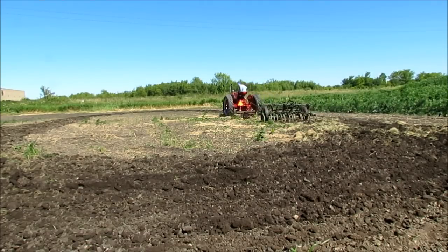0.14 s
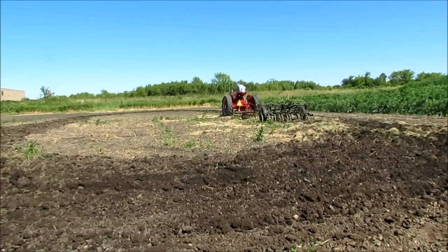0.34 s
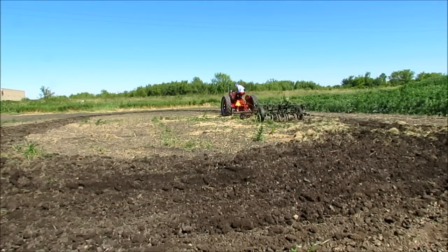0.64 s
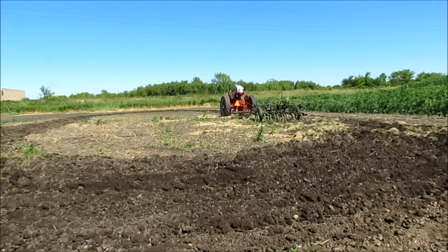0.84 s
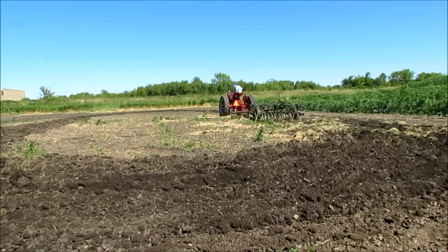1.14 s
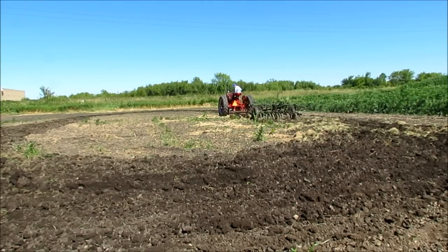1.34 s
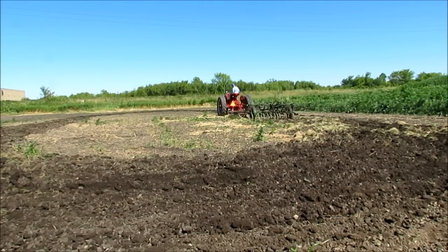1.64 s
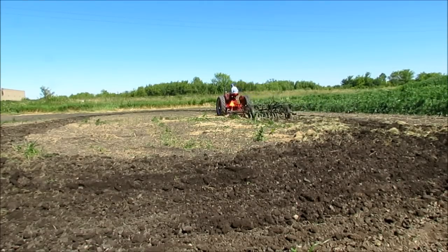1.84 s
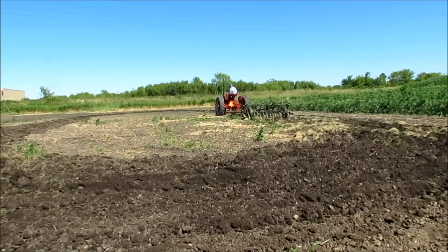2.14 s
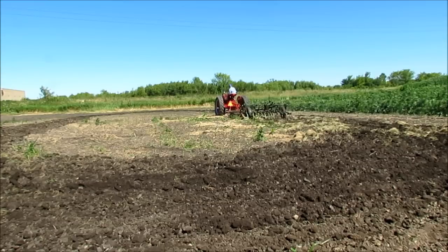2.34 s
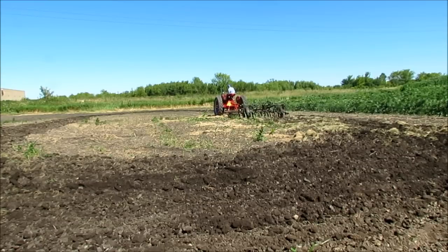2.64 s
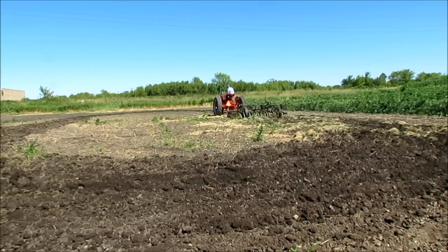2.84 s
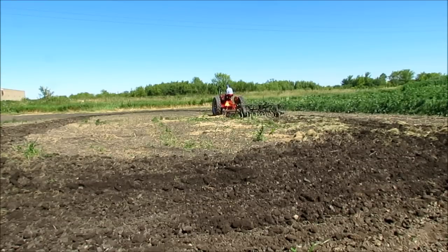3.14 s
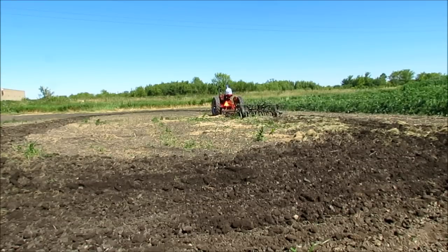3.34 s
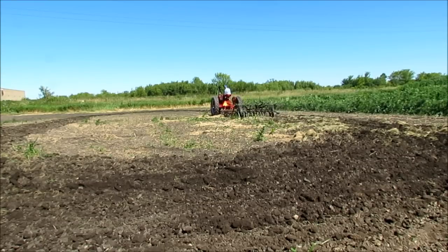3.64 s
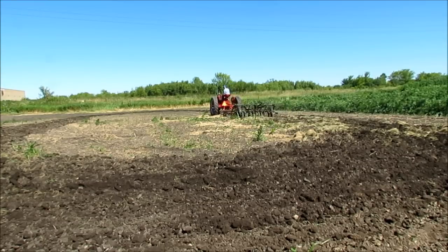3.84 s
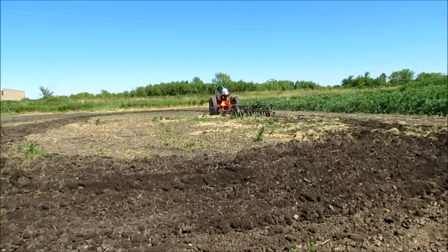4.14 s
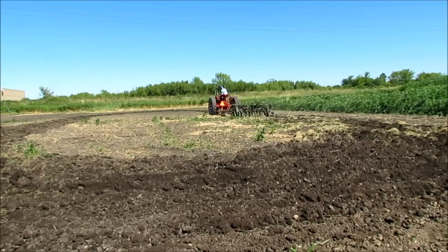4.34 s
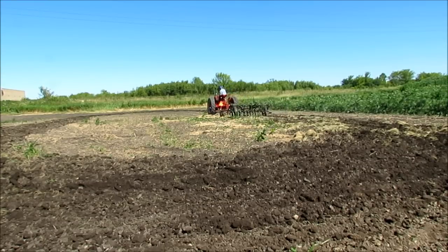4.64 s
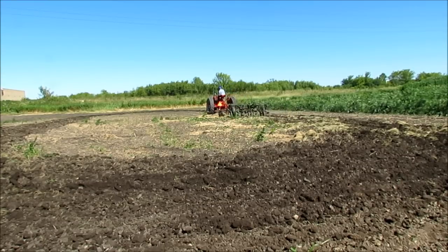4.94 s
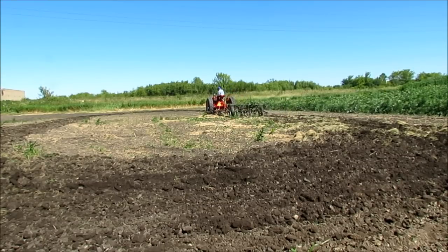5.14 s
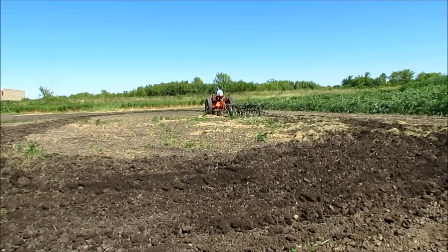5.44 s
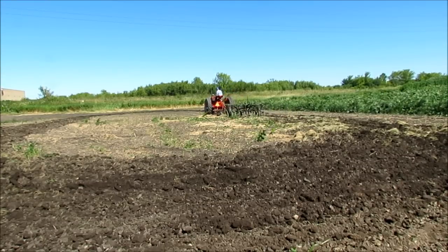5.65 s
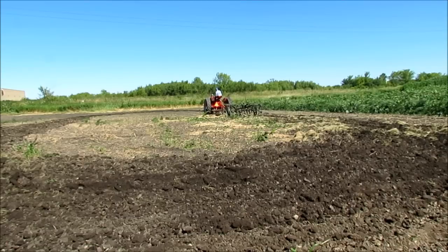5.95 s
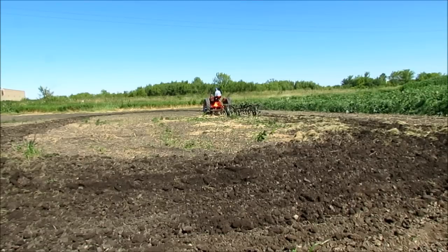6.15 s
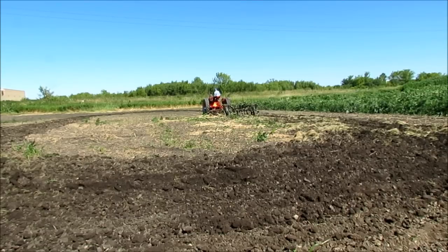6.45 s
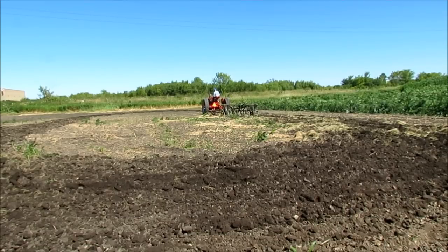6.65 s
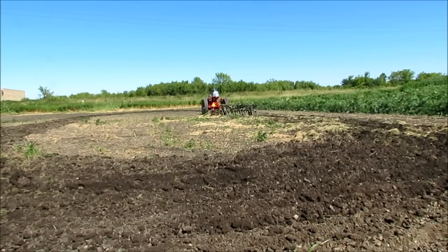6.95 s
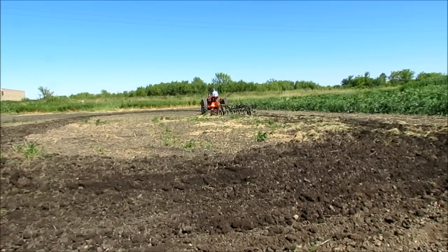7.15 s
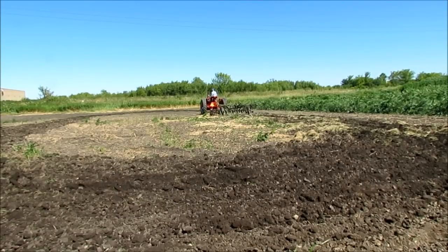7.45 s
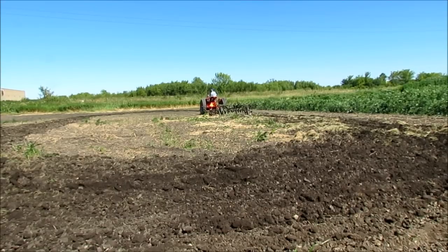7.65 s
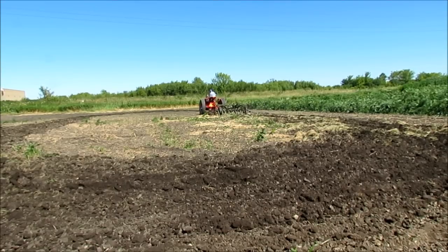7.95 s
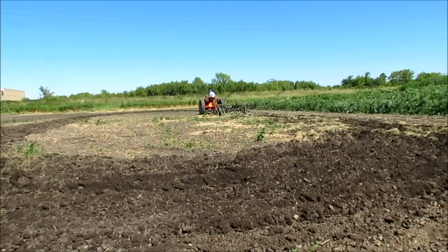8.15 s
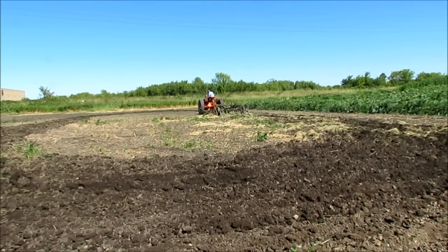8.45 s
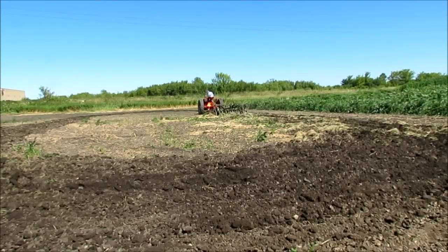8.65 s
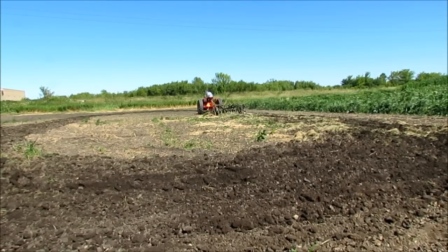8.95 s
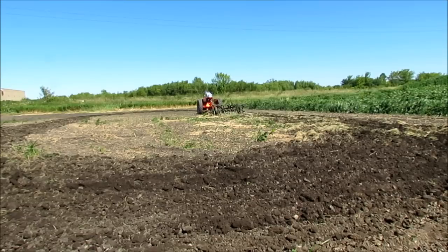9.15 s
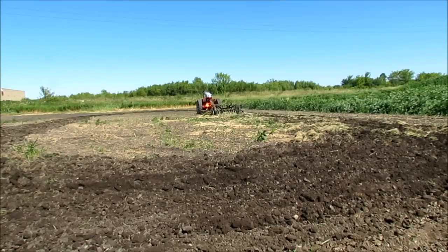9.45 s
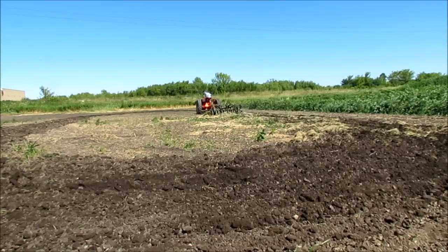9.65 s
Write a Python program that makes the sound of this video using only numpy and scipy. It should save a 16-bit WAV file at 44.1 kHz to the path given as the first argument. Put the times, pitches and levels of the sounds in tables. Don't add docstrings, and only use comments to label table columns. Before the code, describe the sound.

An old four-cylinder tractor pulls a harrow about thirty metres away in an open field. Its exhaust gives a rapid, dry, rasping bark at steady governed speed, blurring into a rough buzz over a low drone. Moving air makes the tone brighten, dull and waver. Soft low wind gusts thump and flutter at the microphone, stronger on the left. The engine never stops.

```python
import sys
import numpy as np
from scipy import signal
from scipy.fft import rfft, irfft, next_fast_len
from scipy.io import wavfile
from scipy.ndimage import uniform_filter1d, map_coordinates

SR = 44100
rng = np.random.default_rng(int(sys.argv[2]) if len(sys.argv) > 2 else 0)


def natural_amplitude(level_db):
    exponent = np.asarray(level_db, float) / 20
    return 10 ** exponent


def unload_audio(sound):
    columns = np.transpose(np.atleast_2d(sound))
    steps = np.round(np.clip(columns, -1, 1) * 32767)
    wavfile.write(sys.argv[1], SR, steps.astype(np.int16))


N = 432621
BEAT_HZ = 40.6


def unit(x):
    return x / np.sqrt(np.mean(np.abs(x) ** 2) + 1e-20)


def along(points, hz):
    f, v = np.transpose(points)
    return np.interp(np.log(hz + 1), np.log(f + 1), v)


def curves(rows, t):
    s, *columns = np.transpose(rows)
    return np.array([np.interp(t, s, c) for c in columns])


def wobble(rate):
    knots = rng.standard_normal(int(N * rate / SR) + 4)
    return map_coordinates(knots, [np.arange(N) * rate / SR])


def coloured(spectrum):
    size = next_fast_len(N)
    white = rfft(rng.standard_normal(size))
    gain = natural_amplitude(along(spectrum, np.fft.rfftfreq(size, 1 / SR)))
    return unit(irfft(white * gain, size)[:N])


def swell(t, s, length):
    return np.cos(np.pi * np.clip((t - s) / length, -.5, .5)) ** 2


# (time [s], lag [ms])
FIRING_LAG = [(0.0, -10.9), (0.7, -13.9), (1.0, -11.1), (1.2, -5.5), (1.4, -3.0), (1.8, -0.6), (2.2, -2.5),
              (3.1, 11.2), (3.6, 8.2), (4.6, 8.9), (5.0, 6.7), (6.0, -23.1), (6.75, -26.4), (7.55, -10.3),
              (8.05, -9.3), (8.6, 5.8), (9.2, 6.3), (9.81, 19.0)]


def firings():
    beat = np.arange(-1, int(N / SR * BEAT_HZ) + 2) / BEAT_HZ

    def lag(t):
        return curves(FIRING_LAG, t)[0] / 1000

    return beat + lag(beat + lag(beat))


# (ring [dB], crack [dB], rasp [dB], fizz [dB])
CYLINDERS = [
    (-34, -33, -36, -37),
    (-37, -31.5, -32, -33),
    (-34.5, -33, -36, -37.5),
    (-38.5, -31, -34.5, -35),
]
# (time [s], carry [dB], treble lean [dB])
CARRY = [(0.0, 1.65, 0.4), (1.05, 1.1, 0), (1.15, 3, 0.5), (1.94, -1, -2.5), (2.04, 2.8, -0.9),
         (2.72, -3, 0.1), (3.86, 3.5, -0.7), (3.96, -7.5, 0), (4.33, -0.5, 1.2), (5.71, 0.6, -0.8),
         (5.81, -4.5, -1.5), (5.91, -1, 1.4), (6.19, 4, -1.8), (8.04, 0.1, -1.05), (8.46, 3, -2.4),
         (9.12, -2, -3), (9.31, 3.5, -2), (9.81, 1.1, -3)]
# (time [s], length [s], gain [dB], register [Hz])
EDDIES = [(0, 0.15, -3.5, 7000), (0.18, 0.27, 7, 1000), (0.364, 0.13, 7, 4440), (0.638, 0.18, 3.5, 4300),
          (0.874, 0.11, -7, 7000), (1.168, 0.14, 5.5, 2000), (1.743, 0.16, 7, 7100), (2.71, 0.27, -4, 7000),
          (2.827, 0.16, 8, 4300), (3.174, 0.45, 6, 1400), (3.315, 0.22, -5, 4200),
          (3.526, 0.11, 8.9, 11000), (3.877, 0.075, -11, 2900), (4.278, 0.12, 6, 2090),
          (4.85, 0.33, -4.0, 4500), (5.415, 0.35, -4.6, 7100), (5.548, 0.1, 8.5, 11000),
          (5.727, 0.13, 7.5, 7000), (5.983, 0.069, 10.5, 4300), (6.07, 0.27, -9.5, 10800),
          (6.707, 0.14, 11, 11500), (7.095, 0.18, -4.5, 4260), (7.46, 0.43, 8, 11000),
          (7.702, 0.15, 7.5, 6950), (7.7, 0.44, 4, 1000), (7.875, 0.1, 12.7, 11000),
          (7.965, 0.3, -4.5, 2900), (8.684, 0.33, -4, 2040), (9.48, 0.18, -7, 4300),
          (9.703, 0.16, 6.5, 10800)]
# (time [s], extra level [dB], register [Hz])
ODD_FIRINGS = [(0.087, 3.5, 2900), (0.775, 4, 1400), (1.55, 10, 11000), (2.018, 7, 7000), (2.214, 3, 1400),
               (2.565, 3.5, 4300), (2.615, 3, 2900), (3.09, 6.5, 4360), (3.949, 4.0, 2900),
               (4.418, 3, 2900), (4.492, 4, 4300), (4.688, 2, 1000), (4.737, 4.5, 7000), (5.007, 3.5, 2000),
               (5.054, 5.5, 2900), (5.628, 4, 11000), (6.06, 5, 4300), (6.898, 5.5, 2000), (7.823, 6, 1000),
               (8.095, 8.5, 7000), (8.273, 4, 2900), (8.349, 5, 4300), (8.45, 7.5, 4370),
               (8.526, 5.5, 4270), (8.577, 8, 11200), (8.676, 8, 11000), (8.922, 4, 7000), (8.947, 7, 7000),
               (9.244, 5.5, 1000), (9.344, 6.5, 4300)]
REGISTERS_HZ, REACH_OCT = [1400, 2900, 5460, 9700], 1.35


def arrival(times):
    carry_db, lean_db = curves(CARRY, times)
    cylinder = np.arange(len(times)) % len(CYLINDERS)
    level_db = np.transpose(CYLINDERS)[:, cylinder] + carry_db + np.outer([-1, 0, 1, 1], lean_db)

    def share(hz):
        return np.exp(-(np.log2(hz / np.array(REGISTERS_HZ)) / REACH_OCT) ** 2)

    for s, length, db, hz in EDDIES:
        level_db += db * np.outer(share(hz), swell(times, s, length))
    for s, db, hz in ODD_FIRINGS:
        level_db[:, np.argmin(abs(times - s))] += db * share(hz)
    return level_db


def peak(hz, centre, width):
    return 1 / (1 + (2 * (hz - centre) / width) ** 2)


# (frequency [Hz], density [dB per Hz])
BARK = [(240, -3.5), (400, -19), (570, -11), (814, -16.5), (1110, -4.5), (1730, -4.5), (2840, -4.5),
        (4380, 2), (8760, -2.5), (11200, -6.5), (16000, -20)]
# (frequency [Hz], width [Hz], height [dB])
STACK = [(573.8, 21.5, 10), (1138, 40, 3), (1468, 76, 7), (1730, 285, 10), (2144, 50, 5.5), (2820, 60, 3)]


def bark_colour(hz, crack_hz, match_db, crack_db=9, crack_width_hz=850, dull_hz=8330, dull_db=4.5):
    count = len(crack_hz)
    crack_hz, depth = crack_hz[:, None], natural_amplitude(match_db)[:, None]
    colour_db = along(BARK, hz) + sum(db * peak(hz, c, w) for c, w, db in STACK)
    colour_db = colour_db + crack_db * peak(hz, crack_hz, crack_width_hz)
    colour_db = colour_db - 7 * depth * peak(hz, 1.54 * crack_hz, 1170)
    colour_db = colour_db - 4 * depth * peak(hz, 0.698 * crack_hz, 150)
    firing, pitch = spot_knots(count, hz)
    slow = map_coordinates(rng.standard_normal((count // 5 + 2, 40)), [firing / 5, pitch], order=1)
    colour_db = colour_db + 2.5 * slow * np.clip(hz / 7000, 0, 1)
    loss_db = dull_db * rng.exponential(size=(count, 1))
    return colour_db - loss_db * np.clip(hz / dull_hz - 1, 0, 1)


def spot_knots(count, hz):
    return np.broadcast_arrays(np.arange(count)[:, None], 7 * np.log(1 + hz / 700))


# (low edge [Hz], high edge [Hz], rise [ms], t60 [ms], echo [dB], steady rush [dB],
# scatter [dB])
PARTS = [
    (880, 2285, 4.06, 42.5, -32, -39, 0.64),
    (2007, 3330, 2.8, 14, -29, -20.5, 1.53),
    (3620, 6800, 4.67, 24, -37, -19.5, 1.5),
    (7980, 21000, 2.35, 20.7, -39, -26.5, 3),
    (430, 990, 3.13, 45, -18.5, -17, 2),
]
# (time [s], frequency [Hz], match [dB])
GROUND = [(0, 3030, -4.5), (1, 2930, -0.5), (1.7, 3000, -0.5), (2.1, 2530, -2), (2.45, 2860, 2.5),
          (3.1, 3130, -3.5), (3.6, 2500, -2), (3.92, 2970, 2), (4.76, 2490, 1), (5.04, 3340, -.5),
          (5.7, 3150, -5.5), (6.0, 2550, -1), (7.1, 2300, -3.5), (7.4, 3470, -7), (7.85, 2390, -2.5),
          (8.35, 2880, 1.5), (8.7, 2290, -2), (9.81, 2400, -2.5)]
# (frequency [Hz], side minus mid [dB])
WIDTH = [(500, -20), (1290, -14), (2380, -8), (4400, -9.5), (8120, -12), (15000, -12.5)]
# (frequency [Hz], share of the side that leans left [1])
LEAN = [(500, -1.4), (1290, -0.98), (2380, -0.44), (4400, 0.23), (15000, -0.58)]


def exhaust(times, echo_ms=9.4, ripple_db=3.0, hoot_db=-41):
    count, size, lead = len(times), 2048, 256
    period = SR / BEAT_HZ
    ms, hz = (np.arange(size) - lead) / SR * 1000, np.fft.rfftfreq(size, 1 / SR)
    level_db, (crack_hz, match_db) = arrival(times), curves(GROUND, times)
    level_db[1] += match_db
    hoot = hoot_db + .5 * (level_db[0] - level_db[0].mean())
    colour = natural_amplitude(bark_colour(hz, crack_hz, match_db))
    ripple = rng.standard_normal((count, 40))
    spots = natural_amplitude(ripple_db * map_coordinates(ripple, spot_knots(count, hz), order=1))

    late_ms = 1 + rng.normal(0, 0.093, (count, 1))
    overlap = np.clip(1 - abs(np.arange(size) - size / 2) / (size / 2), 0, 1) ** .5
    gas = rng.standard_normal((2, 2, count, size), np.float32)
    rush = rfft(gas[1] * overlap)
    drag_db = 2.67 * rng.standard_normal((count, 1))
    z = 0
    for (lo_hz, hi_hz, rise, t60, echo_db, rush_db, scatter_db), db in zip(PARTS, [*level_db, hoot]):
        rise = rise * natural_amplitude(2.0 * rng.standard_normal((count, 1)) + drag_db)

        def puff(t):
            return np.clip(t / rise, 0, 1) ** 2 * natural_amplitude(-60 * np.maximum(t - rise, 0) / t60)

        shape = puff(ms - late_ms) + natural_amplitude(echo_db) * puff(ms - late_ms - echo_ms)
        burst = rfft(gas[0] * shape.astype(np.float32)) * spots
        band = colour / np.sqrt((1 + (lo_hz / (hz + 1)) ** 12) * (1 + (hz / hi_hz) ** 12))
        part = (burst + natural_amplitude(rush_db) * rush) * band
        power = 2 * np.sum(abs(part) ** 2, -1, keepdims=True) / size / period
        firing_gain = natural_amplitude(db + scatter_db * rng.standard_normal(count))[:, None]
        z = z + part / np.sqrt(power) * firing_gain

    mid, loose = z
    lean = np.clip(along(LEAN, hz), -1, 1)
    side = natural_amplitude(along(WIDTH, hz)) * (lean * mid + np.sqrt(1 - lean ** 2) * loose)
    at = (np.round(times * SR).astype(int)[:, None] + np.arange(size) + SR - lead).ravel()

    def overlap_add(spectra):
        return np.bincount(at, irfft(spectra, size).ravel())[SR:SR + N]

    return np.array([overlap_add(mid + side), overlap_add(mid - side)])


# (multiple of the crank speed [1], level [dB])
CRANK_ORDERS = [(1, -34), (2, -23.5), (3, -50), (4, -2.5), (5, -12), (6, -13), (7, -46), (8, -17),
                (9, -21.5), (10, -20), (11, -21.5)]
# (frequency [Hz], density [dB per Hz])
RUMBLE = [(20, -30), (55, -12), (100, -7), (220, -6.5), (300, -8.5), (600, -8), (1000, -2), (16000, -14)]


def drone(times, db=-39, rumble_db=-42, carry_share=0.3):
    t = np.arange(N) / SR
    turns = np.interp(t, times, np.arange(len(times))) / 2
    orders = 0
    for k, level_db in CRANK_ORDERS:
        sway = natural_amplitude(level_db + .9 * wobble(5.9))
        phase = 2 * np.pi * (k * turns + rng.random()) + .25 * wobble(13)
        orders = orders + sway * np.sin(phase)
    carried_db = carry_share * curves(CARRY, t)[0]
    rumble = natural_amplitude(rumble_db + 2 * carried_db) * coloured(RUMBLE)
    return natural_amplitude(db + carried_db) * np.sqrt(2) * orders + rumble


# (time [s], buffet [dB])
BREEZE = [(0, -41), (1.3, -48), (2.5, -50.5), (2.8, -38.5), (5.4, -41), (5.85, -50), (6.3, -41),
          (7.35, -43), (7.56, -41.5), (8, -38.5), (8.85, -48.5), (9.81, -35)]
# (time [s], length [s], low buffet [dB], flutter over the buffet [dB])
GUSTS = [(0.124, 0.081, -48, 13), (0.646, 0.11, -32, 2), (1.054, 0.26, -46.5, 15.5), (1.33, .1, -39, 15.5),
         (1.79, 0.16, -32, -31), (2.83, 0.087, -40, -7), (3.09, 0.34, -37.5, 13), (3.46, 0.69, -34.5, 2.5),
         (3.722, 0.15, -35, 12), (4.054, 0.37, -41, -24), (4.25, 0.1, -37, 2), (4.4, 0.11, -34, 0),
         (4.75, 0.7, -58, -5), (5.043, 0.2, -42, 14.5), (5.154, 0.11, -37, 1), (6.165, 0.27, -36, 7),
         (6.52, .36, -28.5, 7), (6.76, 0.2, -33.5, 3.5), (6.884, 0.22, -34.5, 4.5), (7.15, 0.54, -32, -16),
         (7.428, 0.11, -29, -14), (7.657, 0.11, -42, 14), (7.846, 0.15, -27.5, 3), (8.173, 0.072, -33.5, 7),
         (8.337, 0.1, -30, -8), (8.76, 0.061, -32.5, 4), (9.037, 0.11, -24, -5.5), (9.164, 0.13, -27, 1),
         (9.305, 0.11, -29, -5), (9.593, 0.33, -32.5, 2)]


def gusting(fitful_db=2):
    t = np.arange(N) / SR
    buffet = natural_amplitude(curves(BREEZE, t)[0] + fitful_db * wobble(12))
    flutter = buffet * natural_amplitude(fitful_db * wobble(19))
    for s, length, db, flutter_db in GUSTS:
        near = slice(max(int((s - length / 2) * SR), 0), int((s + length / 2) * SR))
        push = natural_amplitude(db) * swell(t[near], s, length)
        buffet[near] += push
        flutter[near] += push * natural_amplitude(flutter_db)
    return buffet, flutter


def even(x, size):
    return x / np.sqrt(abs(uniform_filter1d(x ** 2, size=size)) + 1e-6)


# (frequency [Hz], density [dB per Hz])
BUFFET = [(15, -30), (30, -13), (70, 6), (160, 3.5), (260, -4), (500, -31)]
# (frequency [Hz], density [dB per Hz])
FLUTTER = [(100, -12), (200, -1.5), (300, 0.5), (500, -2), (750, -10), (1200, -22), (2500, -60)]


def wind(right_db=-7, cross=0.42):
    buffet, flutter = gusting()
    ports = []
    for port_db in (0, right_db):
        lumps_db = 1.1 * wobble(30) + 2.6 * wobble(110)
        low = even(natural_amplitude(0.27 * lumps_db) * coloured(BUFFET), size=6000)
        high = even(natural_amplitude(3.3 * lumps_db) * coloured(FLUTTER), size=2500)
        ports.append(natural_amplitude(port_db) * (buffet * low + flutter * high))
    left, right = ports
    return np.array([left - cross * right, right - cross * left])


def scene():
    times = firings()
    return exhaust(times) + drone(times) + wind()


def top_cut(x):
    return signal.sosfilt(signal.butter(12, 16490, fs=SR, output="sos"), x)


def record(dry):
    held = dry / (1 + abs(dry / .85) ** 4) ** .25
    limit = signal.ellip(10, .5, 70, 15850, fs=SR, output="sos")
    return top_cut(signal.sosfilt(limit, held))


dry = scene()
out = record(dry)
unload_audio(out)
```